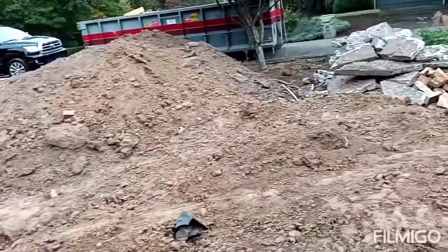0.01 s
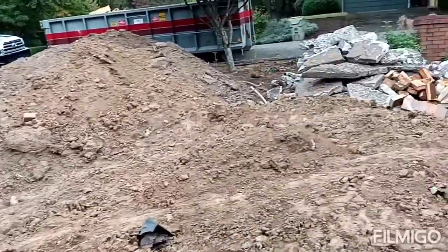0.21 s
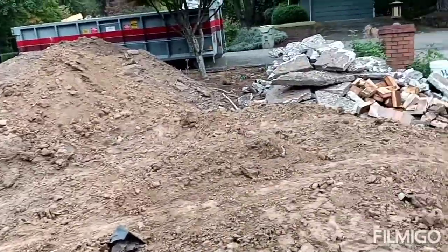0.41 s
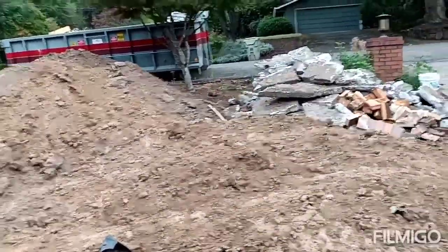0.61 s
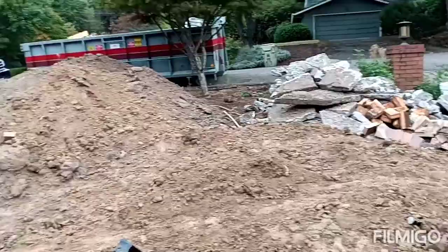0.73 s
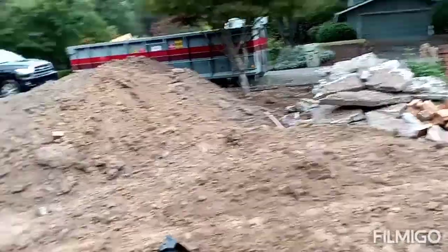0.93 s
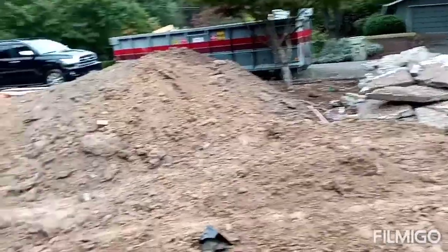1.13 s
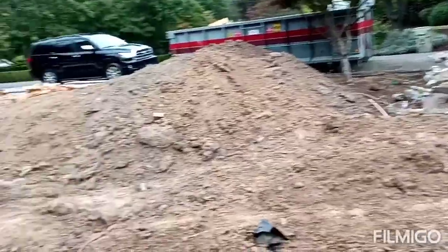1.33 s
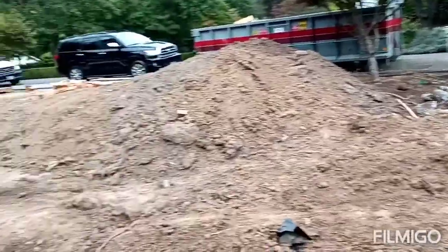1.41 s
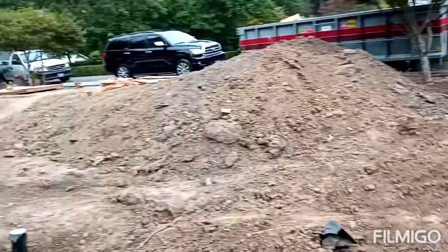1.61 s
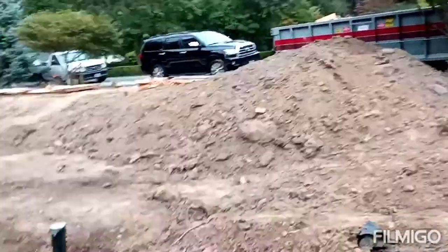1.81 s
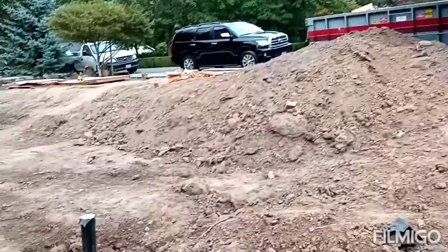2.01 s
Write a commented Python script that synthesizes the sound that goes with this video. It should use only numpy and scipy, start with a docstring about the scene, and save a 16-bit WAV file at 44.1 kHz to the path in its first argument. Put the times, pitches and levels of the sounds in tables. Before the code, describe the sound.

A hard crash hits at about 0.2 seconds on an outdoor building site, cracking and clanging, with ringing and echoes fading over a second. Dull thumps, a faint hollow rumble, small rubble scrapes and thin squeaks lie underneath. A low buffet touches the right microphone at 1.3 seconds. A lighter, shorter crash follows at 1.7, then a few sharp knocks close on the left around 1.9.

```python
"""A faint ringing hangs over a building site, then a hard crash rolls back from houses and trees.
A lighter crash follows. In each, a struck object cracks, clangs and rings on at its own pitches.
Dull thumps and a hollow rumble lie underneath, with small scrapes of rubble and thin squeaks.
Close by, low buffets hit the right microphone, and a few sharp knocks sound near the end."""
import sys
import numpy as np
from scipy import signal
from scipy.fft import rfft, irfft
from scipy.io import wavfile

SR = 44100
rng = np.random.default_rng(int(sys.argv[2]) if len(sys.argv) > 2 else 0)


def bounce(signal):
    """Save signal as a 16-bit WAV file at the path given by the first command-line argument."""
    frames = np.transpose(np.atleast_2d(signal))
    limited = np.clip(frames, -1, 1)
    pcm = np.round(limited * 32767).astype(np.int16)
    wavfile.write(sys.argv[1], SR, pcm)


N = 92610
T = np.arange(N) / SR
HZ = np.maximum(np.arange(N // 2 + 1) * SR / N, 1)

# Below, fade_s is the time to drop by 60 dB, and side_db is the left level minus the right.
# Tone of the outdoor background: pitch_hz, level_db
AIR_TONE = [(18, -34), (30, -7.5), (86, 3.5), (221, -9), (364, -6), (437, -10.5), (1320, -8), (3060, -24.5),
            (5900, -26), (8300, -32.5), (13300, -44), (14800, -32.5), (16000, -49.5)]
# Crashes, the first already dying away at the start:
# start_s, level_db, tilt_db_per_octave, contact_db, echo_hold_s, tail_stretch_ratio
CRASH_HITS = [(-.33, -22, 5.5, 0, 0.18, 1), (0.225, -0.5, 0, 0, 0.21, 0.98),
              (1.735, -20.5, -11, -7.5, 0.006, 0.45)]
# Tone of the crack at first contact: pitch_hz, level_db
CRACK_TONE = [(59, -59.5), (100, -25), (424, -8.5), (854, -29.5), (1800, -4), (2690, -19.5), (3780, -18.5),
              (4290, -12.5), (5190, -21.5), (6420, -16.5), (7610, -40), (8110, -58.5), (8640, -34),
              (11200, -28.5), (12700, -34.5), (14700, -28.5), (16000, -51.5)]
# Notes of the struck object: pitch_hz, level_db, fade_s
RING_NOTES = [(187, -7, .6), (418, -2, .65), (501, -6, .7), (565, -6, .7), (1025, -9, .9), (1071, -9, .9),
              (1314, -7, .9), (1529, -4, 1.0), (1608, -1, 1.0), (1712, 2, .9), (1924, 0, .9),
              (2005, -1, .9), (2265, -3, .8), (2299, -4, .8)]
# Tone of the echoes: pitch_hz, level_db
ECHO_TONE = [(24, -52.5), (40, -39), (69, -21.5), (91, -24.5), (112, -8), (189, -7.5), (269, -9.5),
             (422, -2.5), (455, -5.5), (556, -2.5), (733, -11), (942, -12), (1040, -6), (1240, -7),
             (1850, 0), (2260, -4.5), (2700, -13.5), (3650, -12), (4030, -14), (6490, -12.5), (8340, -25),
             (10200, -22.5), (13400, -34.5), (14800, -21.5), (16000, -34.5)]
# How the echoes die away, from bass to treble: pitch_hz, extra_drop_db_per_s, fade_s, side_db
ECHO_BANDS = [(102.1, -16.5, .8, -2), (387, 10, 0.91, 1), (900, -6, 1.104, -2.5), (1850, -13.5, 0.77, 7),
              (3500, 25, 1.6, -2), (6500, 45, 1.8, 3.5), (8550, 62.5, 0.16, 2), (15000, 50, .3, 4)]
# Swells of the rumble: middle_s, level_db, half_length_s
RUMBLE_SWELLS = [(0.066, -41, .04), (0.182, -49, 0.023), (1.336, -51, 0.024), (1.406, -51.5, 0.026),
                 (1.606, -56.5, 0.04), (1.896, -56.5, 0.03), (2.054, -61, 0.03)]
# Hollow tone of the rumble: pitch_hz, level_db
RUMBLE_TONE = [(100, -15), (135, -21), (168, 0.5), (220, -18), (290, -6.5), (340, 3), (400, -10),
               (480, -19), (900, -28.5), (2000, -56)]
# Scrapes and rattles of rubble: start_s, level_db, pitch_hz, width_octaves, hold_s, fade_s, side_db
RUBBLE_SCRAPES = [(0.05, -39, 4800, 0.35, 0.0061, .025, 2), (.053, -43, 1920, 0.28, 0.0064, .03, 8),
                  (0.208, -31.5, 1200, 1.2, 0.0049, 0.022, -2), (0.213, -35.5, 5740, .1, .003, .025, 4),
                  (0.89, -56.5, 3400, .05, 0.035, 0.32, 3), (0.957, -57.5, 603, 0.077, 0.03, 0.095, 11),
                  (1.007, -67, 4500, 0.32, 0.012, .15, 6), (1.328, -66, 2011, 0.53, 0.14, 0.16, 6),
                  (1.399, -64, 4000, .35, .01, 0.43, 5), (1.688, -49.5, 4330, 0.42, 0.0065, 0.24, -23),
                  (1.725, -54.5, 4300, 0.43, 0.041, 0.021, -17), (1.689, -57.5, 810, 0.23, 0.13, 0.25, 5.5),
                  (1.903, -48, 1300, 1.11, 0.014, 0.35, 3.5), (2.058, -59, 2000, 0.63, .04, .2, 2)]
# Thumps and buffets: middle_s, level_db, pitch_hz, half_length_s, side_db
DULL_THUMPS = [(.095, -38, 119, 0.0098, -1), (.28, -37, 88, 0.0083, 1), (.335, -27.5, 145, 0.0081, 3),
               (0.457, -27, 108, 0.024, 1.5), (.51, -28, 140, 0.0053, 1), (.56, -42.5, 85, 0.014, 0),
               (.685, -38.5, 110, 0.015, 0), (0.789, -43, 88, 0.016, 3), (1.115, -58.5, 81, 0.019, -11),
               (1.258, -40, 73.5, 0.018, -30), (1.297, -25.5, 109.7, 0.015, -37),
               (1.313, -35.5, 138.7, 0.0048, -38), (1.429, -42.5, 99.5, .018, 5.5),
               (1.70, -50, 90, 0.024, -26), (1.822, -45, 99, 0.017, -27.5), (1.981, -49.5, 97.5, 0.04, -28)]
# Notes within a thump: pitch_ratio, level_db
THUMP_NOTES = [(0.619, -10), (1, -1), (1.6, -10)]
# Squeaks and pings: start_s, length_s, pitch_hz, level_db, upward_slide_octaves
THIN_SQUEAKS = [(0.209, 0.0062, 5330, -39, 0), (0.887, 0.033, 3474, -51, -.03), (1.909, 0.14, 2425, -58, 1),
                (1.956, 0.2, 6340, -76.5, 0.057)]
# Knocks close by: start_s, level_db, pitch_hz, tick_db, side_db
CLOSE_KNOCKS = [(1.873, -14.5, 1333, -27, 14.5), (1.9083, -29.5, 1520, -6, 5),
                (1.9152, -25.5, 1020, -27, 36)]
# Notes within a knock: pitch_ratio, level_db, fade_s
KNOCK_NOTES = [(.7, -10, 0.0057), (1.15, 0, 0.0057), (1.75, -7, 0.0084), (2.2, -26.5, 0.0066)]

CLANG_HZ = 1597  # the struck object's main note


def undb(db):
    """Turn decibels into a number to multiply a sound by."""
    return 10 ** (np.asarray(db) / 20)


def pan(side_db):
    """Share a sound between left and right, keeping its total power."""
    gains = undb(np.array([[side_db], [-side_db]]) / 2)
    return gains / np.sqrt(np.mean(gains ** 2))


def look_up(table, hz, column=1):
    """Read a table at any pitch, blending between its rows."""
    table = np.array(table, float)
    return np.interp(np.log(hz), np.log(table[:, 0]), table[:, column])


def hump(hz, octaves):
    """A tone shape that is strongest at one pitch and falls away on both sides."""
    return np.exp(-.5 * (np.log2(HZ / hz) / octaves) ** 2)


def noise(tone, alike=0, bass_hz=420, left_delay_s=0.00048):
    """Stereo noise. Both sides share most bass and at least `alike` of the rest, later on the left."""
    common, left, right = rfft(rng.standard_normal((3, N)))
    share = np.maximum(alike, 0.9 / (1 + (HZ / bass_hz) ** 4))
    shared = np.array([common * np.exp(-2j * np.pi * HZ * left_delay_s), common])
    mix = np.sqrt(share) * shared + np.sqrt(1 - share) * np.array([left, right])
    sound = irfft(tone * mix, N)
    return sound / sound.std()


def wobble(rate_hz):
    """A smooth random wander, about 1 either side of zero."""
    curve = irfft(rfft(rng.standard_normal(N)) * np.exp(-(HZ / rate_hz) ** 2), N)
    return (curve - curve.mean()) / curve.std()


def fade(age, fade_s):
    """Full level until age 0, then 60 dB quieter every fade_s."""
    return np.exp(-np.log(1000) * np.maximum(age, 0) / fade_s)


def burst(age, rise_s, hold_s, fade_s):
    """A level that rises, holds until hold_s, then fades."""
    return np.clip(age / rise_s, 0, 1) * fade(age - hold_s, fade_s)


def tilt(hz, tilt_db):
    """Turn bass and treble up or down by tilt_db for each octave away from the clang."""
    return undb(tilt_db * abs(np.log2(hz / CLANG_HZ)))


def air(level_db=-60, waver_db=.7):
    """A quiet outdoor hush that wavers a little."""
    return noise(undb(look_up(AIR_TONE, HZ))) * undb(level_db + waver_db * wobble(8))


def ring(age, tilt_db, waver_hz=2.56, waver_db=4.0):
    """The struck object keeps vibrating at its own notes, each slightly unsteady."""
    out = 0
    for hz, db, fade_s in RING_NOTES:
        cycles = np.cumsum(hz + waver_hz * wobble(25)) / SR
        cycles = cycles + rng.random((2, 1))  # out of step at the two microphones
        level = undb(db + waver_db * wobble(18)) * tilt(hz, tilt_db)
        out += level * np.sin(2 * np.pi * cycles) * burst(age, .03, .14, fade_s)
    return out


def echoes(age, hold_s, tilt_db, bend_s=0.019, late_db=-14, late_fade_s=1.69, flutter_db=0.5):
    """Many echoes from houses and trees blur together; the bass builds late, the treble drops first."""
    spectrum = rfft(noise(undb(look_up(ECHO_TONE, HZ)), alike=.08))
    past_hold = bend_s * np.logaddexp(0, (age - hold_s) / bend_s)  # eases from holding into fading
    out = 0
    for hz in 1000 * 2. ** (np.arange(-10, 9) / 2):  # bands half an octave apart
        band = irfft(spectrum * np.maximum(1 - 2 * abs(np.log2(HZ / hz)), 0), N)
        drop_db_per_s, fade_s, side_db = (look_up(ECHO_BANDS, hz, column) for column in (1, 2, 3))
        rise_s = 0.0061 + 0.21 / (1 + (hz / 220) ** 2)
        rise = np.clip(age / rise_s, 0, 1)
        decay = np.hypot(fade(past_hold, fade_s), undb(late_db) * fade(age, late_fade_s))
        extra_drop = undb(-drop_db_per_s * np.maximum(age - .08, 0))
        out += band * rise * decay * extra_drop * tilt(hz, tilt_db) * pan(side_db)
    return out * undb(flutter_db * wobble(45))


def crashes(crack_db=-15.5, clang_db=-10, ring_db=-32, echo_db=-18, clang_delay_s=.007):
    """Each hit makes a ragged crack and a clang, then leaves a tail of ringing and echoes."""
    out = 0
    for start, db, tilt_db, contact_db, hold_s, stretch in CRASH_HITS:
        age = T - start
        crack = noise(undb(look_up(CRACK_TONE, HZ)) * tilt(HZ, tilt_db), alike=0.98)
        crack *= burst(age, 0.0033, 0.015, 0.028) * pan(1)
        clang = noise(hump(CLANG_HZ, 0.1), alike=0.98)
        clang *= burst(age - clang_delay_s, 0.00062, .001, 0.038) * pan(0.5)
        contact = undb(crack_db) * crack + undb(clang_db) * clang
        tail = undb(ring_db) * ring(age / stretch, tilt_db)
        tail += undb(echo_db) * echoes(age / stretch, hold_s, tilt_db)
        out += undb(db) * (undb(contact_db) * contact + tail)
    return out


def rumble():
    """Low, hollow noise that comes and goes in short swells."""
    level = sum(undb(db) * np.exp(-.5 * ((T - middle) / half_length) ** 2)
                for middle, db, half_length in RUMBLE_SWELLS)
    return level * noise(undb(look_up(RUMBLE_TONE, HZ)), alike=1.0)


def scrapes(grit_db=1.0):
    """Rubble scrapes in short bursts of noise; a fast flicker in level makes them gritty."""
    out = 0
    for start, db, hz, width, hold_s, fade_s, side_db in RUBBLE_SCRAPES:
        level = undb(db - grit_db * wobble(400)) * burst(T - start, 0.00067, hold_s, fade_s)
        out += level * pan(side_db) * noise(hump(hz, width), alike=0.45)
    return out


def thumps(pitch_waver=.08):
    """Soft pushes, each only a few uneven low waves long."""
    out = 0
    for middle, db, hz, half_length, side_db in DULL_THUMPS:
        cycles = np.cumsum(hz * (1 + pitch_waver * wobble(70))) / SR
        cycles -= np.interp(middle, T, cycles)  # all the notes peak together in the middle
        push = sum(undb(note_db) * np.cos(2 * np.pi * ratio * cycles) for ratio, note_db in THUMP_NOTES)
        out += undb(db) * pan(side_db) * push * np.exp(-((T - middle) / half_length) ** 2)
    return out


def squeaks(slide_s=0.0087, pitch_waver=0.0041):
    """Thin, brief tones; most slide quickly to their pitch before they fade."""
    out = 0
    for start, length, hz, db, slide in THIN_SQUEAKS:
        age = np.maximum(T - start, 0)
        octaves_below = slide * np.exp(-(age / slide_s) ** 2)
        pitch = hz * 2 ** -octaves_below * (1 + pitch_waver * wobble(200))
        tone = np.sin(2 * np.pi * np.cumsum(pitch) / SR)
        out += undb(db) * tone * burst(age, length / 6, length / 2, 2 * length)
    return out * pan(2)


def knocks(tick_hz=6680, snap_hz=15000, snap_db=-16, tail_db=-30):
    """Woody knocks whose notes die at once, with a bright tick and a faint tail."""
    out = 0
    for start, db, hz, tick_db, side_db in CLOSE_KNOCKS:
        age = np.maximum(T - start, 0)
        body = sum(undb(note_db) * np.sin(2 * np.pi * hz * ratio * age) * fade(age, fade_s)
                   for ratio, note_db, fade_s in KNOCK_NOTES)
        body = cut_treble(cut_bass(body, hz=700), hz=3640)
        tick_tone = hump(tick_hz, 0.16) + undb(snap_db) * hump(snap_hz, 0.3)
        tick = undb(tick_db) * noise(tick_tone) * burst(age, 0.00011, 0, 0.01)
        tail = undb(tail_db) * noise(hump(hz, 1.3)) * burst(age, 0.0016, 0, 0.096)
        out += undb(db) * (pan(side_db) * (body + tick) + tail)
    return out


def cut_bass(sound, hz):
    """Steeply turn down everything below hz."""
    return signal.sosfilt(signal.butter(4, hz, "high", fs=SR, output="sos"), sound)


def cut_treble(sound, hz):
    """Gently turn down everything above hz."""
    return signal.sosfilt(signal.butter(2, hz, fs=SR, output="sos"), sound)


def scene():
    """All the sounds added together at the two microphones."""
    return crashes() + scrapes() + knocks() + thumps() + rumble() + squeaks() + air()


def record(dry, bottom_hz=52, top_hz=15700):
    """The recorder thins the deep bass and cuts off the highest treble."""
    top_cut = signal.ellip(8, .2, 70, top_hz, fs=SR, output="sos")
    return signal.sosfilt(top_cut, cut_bass(dry, bottom_hz))


dry = scene()
out = record(dry)
bounce(out)
```